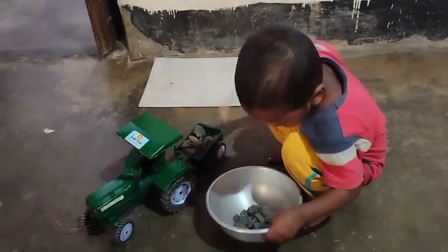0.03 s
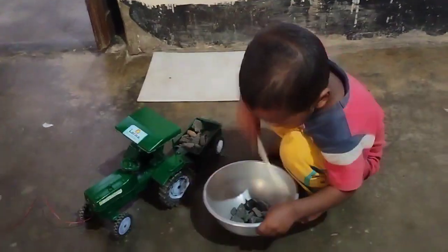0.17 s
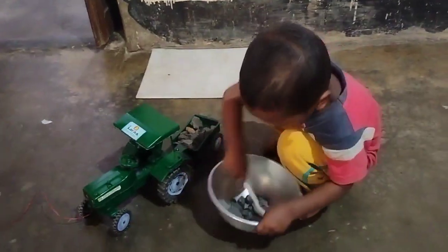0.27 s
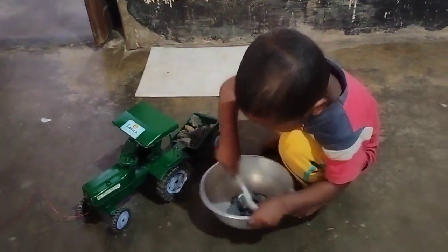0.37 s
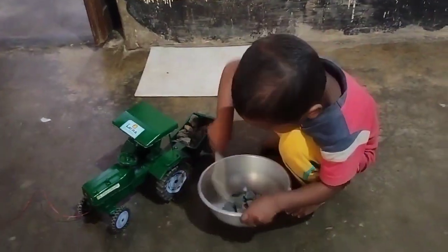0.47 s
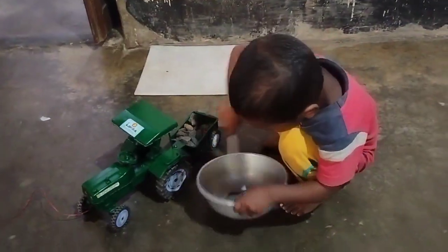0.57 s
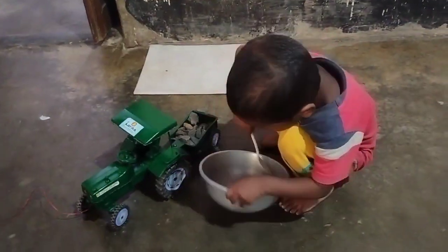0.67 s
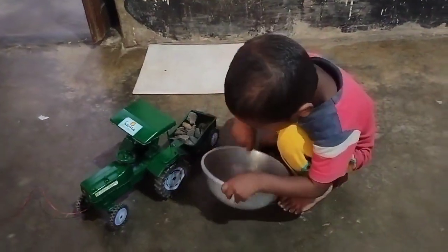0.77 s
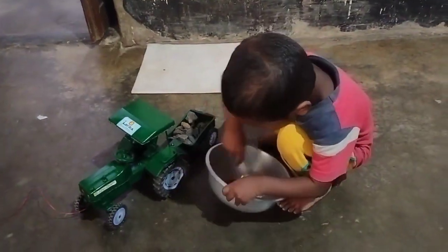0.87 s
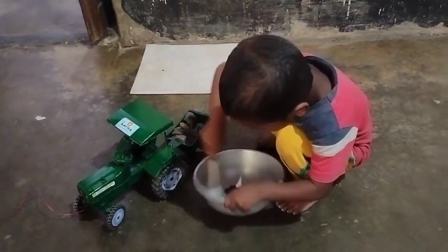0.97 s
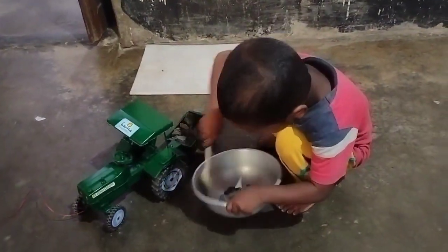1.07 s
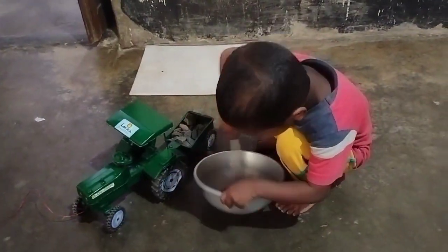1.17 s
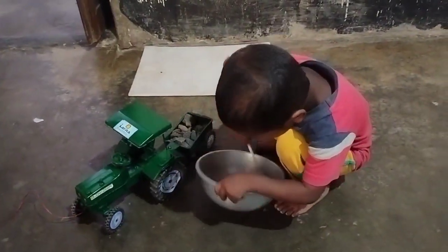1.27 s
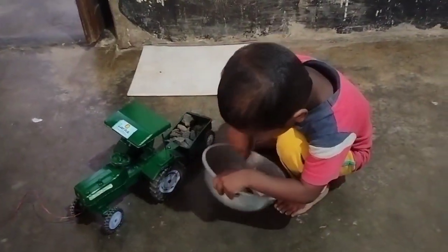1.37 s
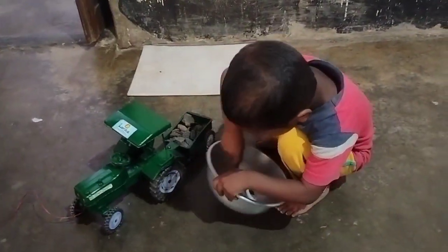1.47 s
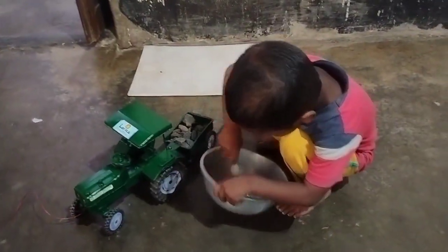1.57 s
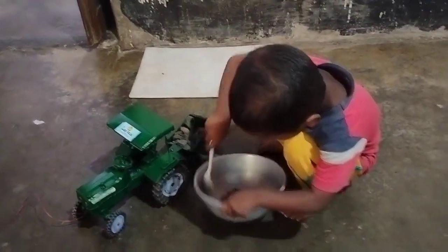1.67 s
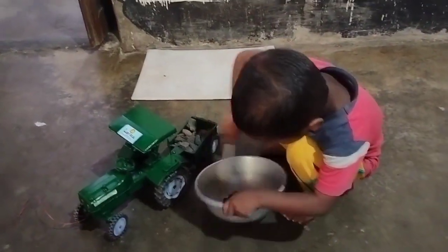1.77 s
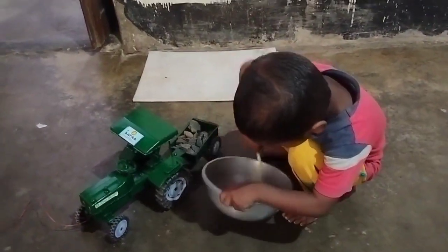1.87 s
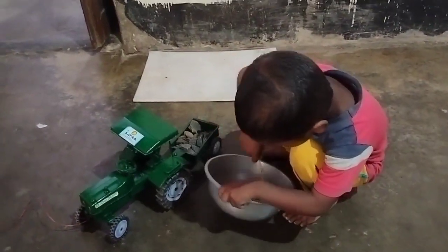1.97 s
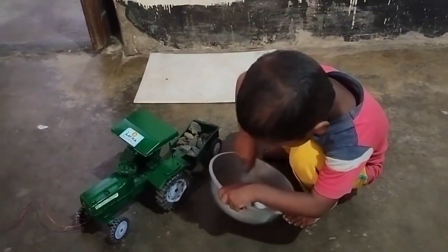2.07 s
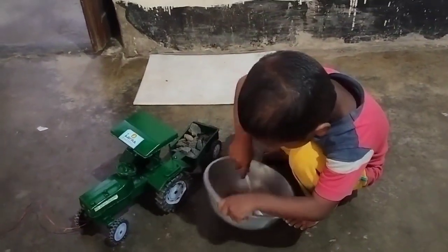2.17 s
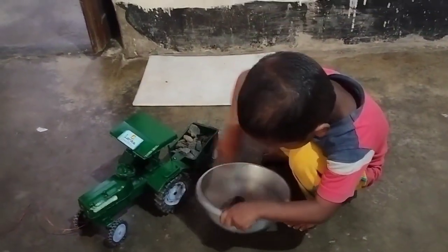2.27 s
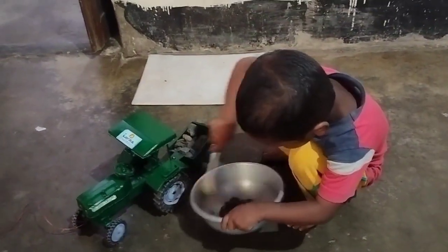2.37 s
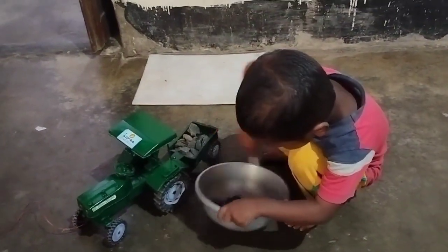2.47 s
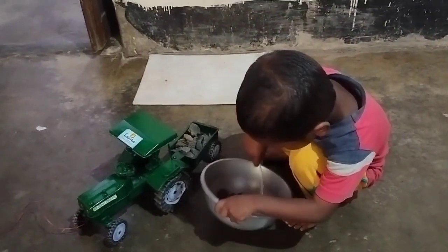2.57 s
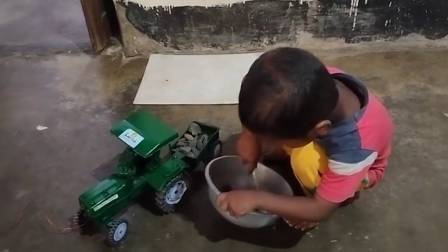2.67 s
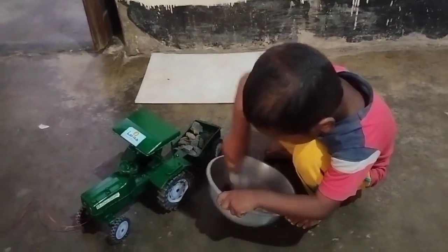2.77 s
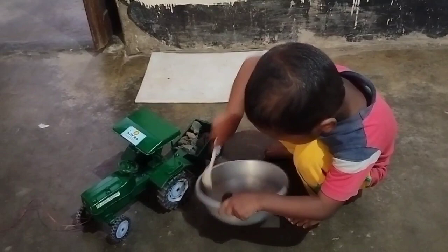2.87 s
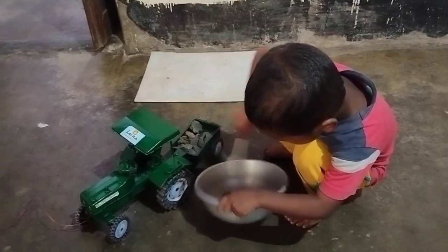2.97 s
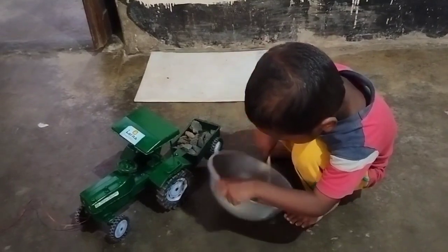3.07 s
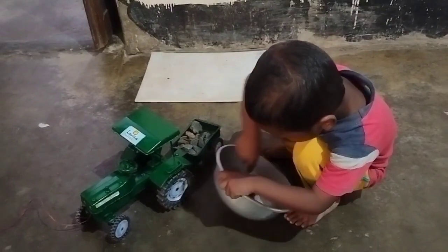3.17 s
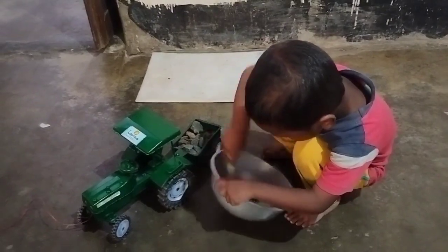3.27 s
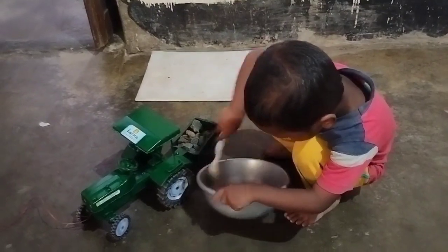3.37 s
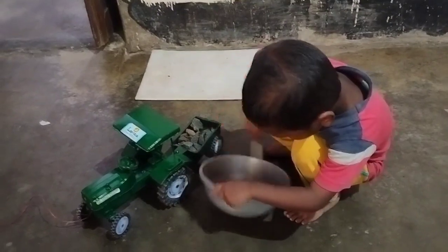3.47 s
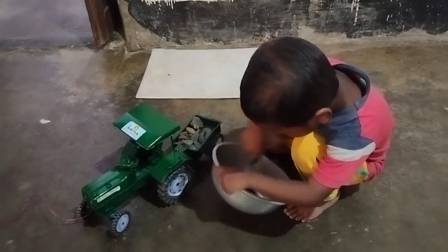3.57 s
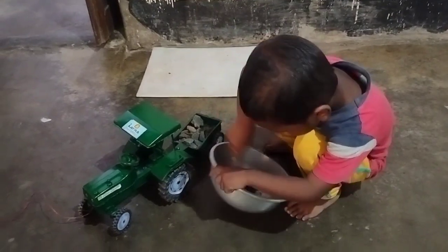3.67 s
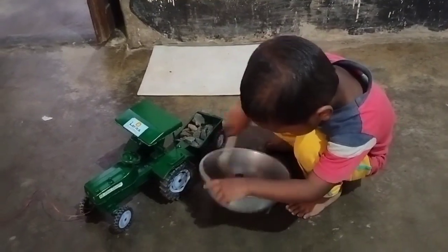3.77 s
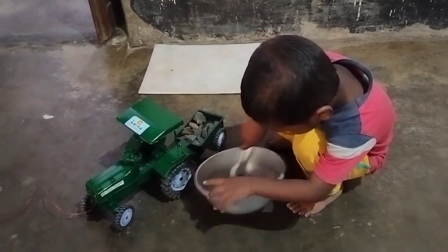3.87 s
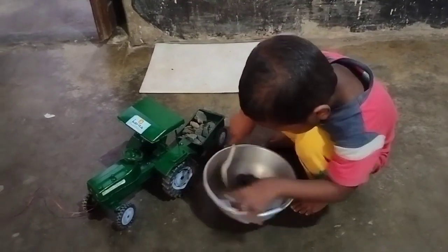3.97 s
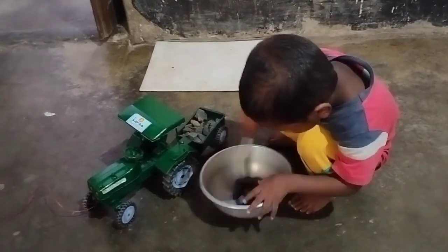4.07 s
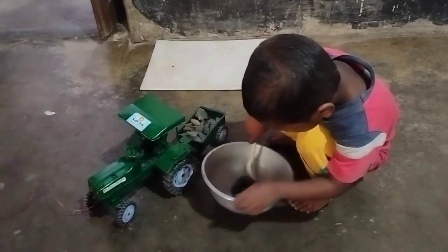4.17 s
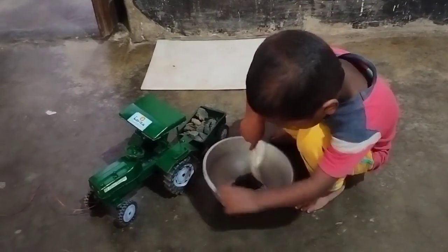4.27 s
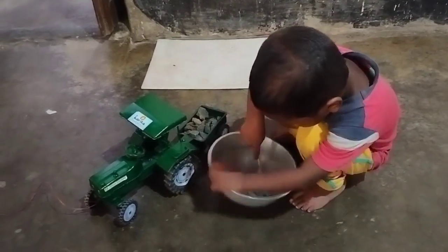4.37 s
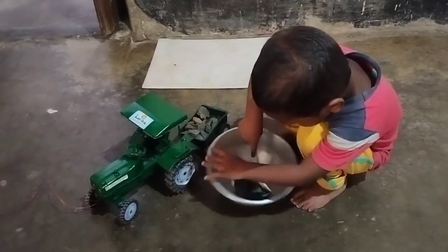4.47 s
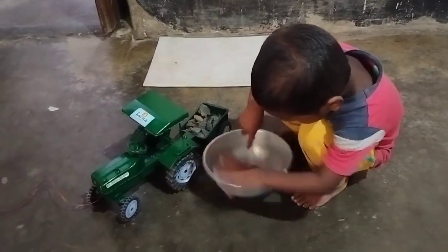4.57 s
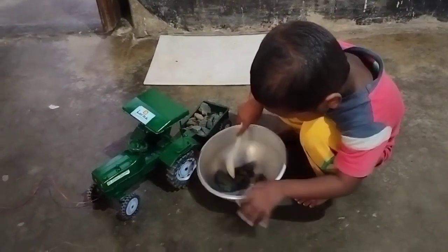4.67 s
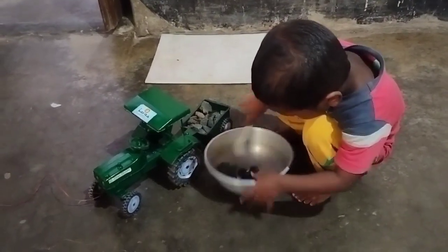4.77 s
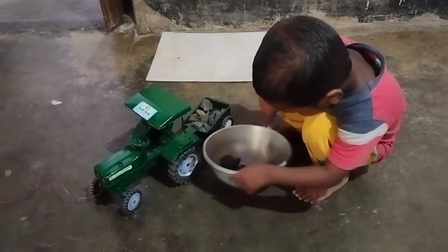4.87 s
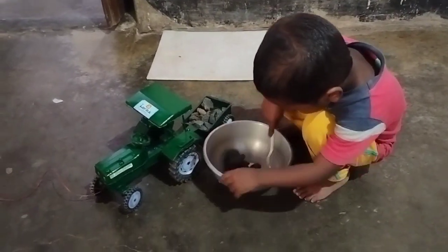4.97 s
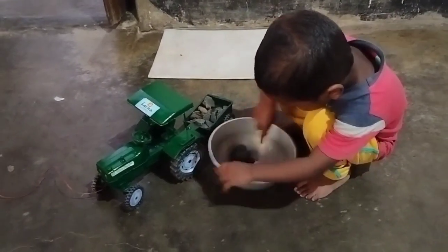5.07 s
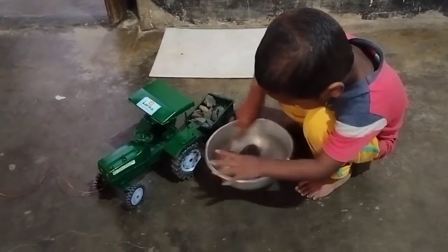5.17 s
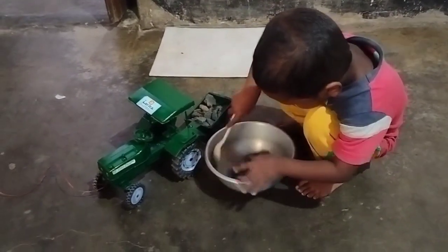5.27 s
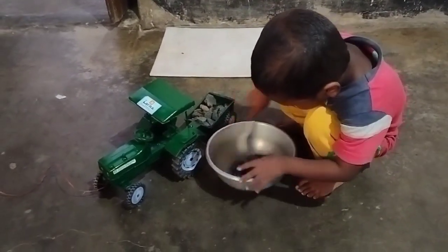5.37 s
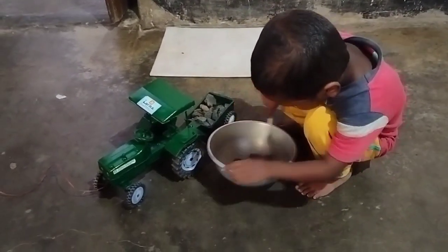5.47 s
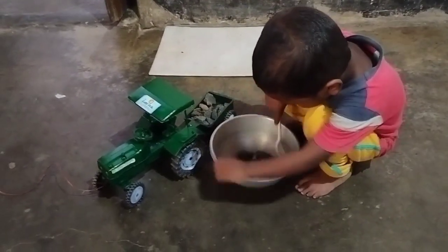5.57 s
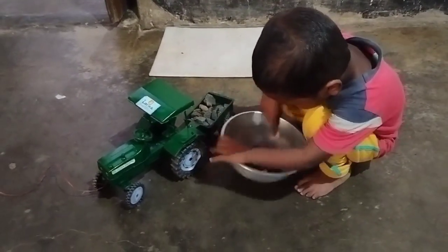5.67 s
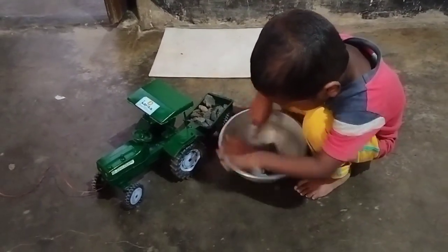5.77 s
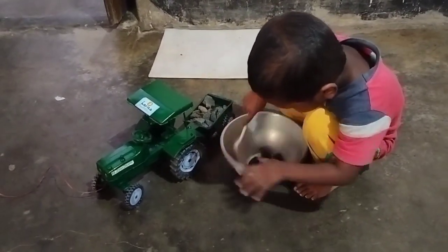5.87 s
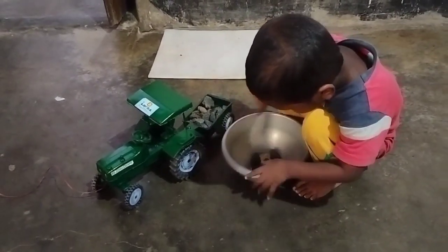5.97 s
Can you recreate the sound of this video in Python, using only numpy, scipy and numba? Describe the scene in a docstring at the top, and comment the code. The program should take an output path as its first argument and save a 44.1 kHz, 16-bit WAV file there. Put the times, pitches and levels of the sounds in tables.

```python
"""On a concrete floor in a bare, hard room, small stones are scooped with a spoon in a hand-held steel bowl.
Shoves, spills and scrapes are random impacts under slow envelopes, coloured by the kind of contact.
Knocks are bursts of rebounds with a short clank, pebbles sine ticks, bumps low swings, rubs gliding resonances.
Contacts ring damped modes of the bowl; close echoes and a room tail follow, over quiet air.
A phone hears it all with two unlike microphones."""
import sys
import numpy as np
from scipy import signal
from scipy.fft import rfft, irfft
from scipy.io import wavfile
from scipy.ndimage import uniform_filter1d
from numba import njit

SR = 44100
rng = np.random.default_rng(int(sys.argv[2]) if len(sys.argv) > 2 else 0)


def waveform_to_disk(signal):
    """Save audio, clipped to [-1, 1], as 16-bit WAV at the path in sys.argv[1]."""
    frames = np.transpose(np.atleast_2d(signal))
    scaled = np.clip(frames, -1, 1) * 32767
    samples = np.round(scaled).astype(np.int16)
    wavfile.write(sys.argv[1], SR, samples)


N = 266089
TIME = np.arange(N) / SR
TOP_HZ = 15300

# source levels in the tables are relative, ahead of the trims in the code
# spoon and stones knocking on the bowl, rms over 5 ms:
# [t/s, wall thud level/dB, stone clack level/dB, edge crack level/dB, steel clank level/dB, clank f/Hz]
KNOCK_EVENTS = [(0.051, -61, -31.5, -52, -40, 2510), (0.302, -8, -17, -21, -7, 810),
                (0.314, -15.5, -8, -10.5, -21, 3550), (0.327, -13, -15, -18, -17, 1470),
                (0.432, -17, -17, -11, -35, 2840), (0.476, -30, -11, -33, -25, 3330),
                (0.487, -16, -9, -33, -22, 3760), (0.529, -18, -10, -26, -30, 2800),
                (0.541, -22, -11, -17, -38, 2750), (0.558, -17, -35, -8.5, -9, 1470),
                (0.842, -27, -21, -35, -28, 2210), (0.895, -30, -20, -40, -40, 855),
                (0.944, -22, -18.5, -27, -30, 845), (1.0, -20, -31, -18, -14, 1500),
                (1.008, -17.5, -30, -12.5, -16.5, 1460), (1.196, -31, -32, -25.5, -28, 1410),
                (1.275, -23.5, -35, -26.5, -20, 1470), (1.505, -21, -22, -35, -30, 3400),
                (1.535, -13.5, -13.5, -21.5, -15, 910), (1.604, -20, -21, -24.5, -19, 920),
                (1.651, -24, -34, -20, -20.5, 640), (1.746, -27, -15.5, -21, -13.5, 1410),
                (1.767, -45, -28, -39, -21, 2780), (1.982, -42, -32, -34, -45, 2980),
                (2.028, -25.5, -25, -40, -36, 3400), (2.154, -27, -24, -40, -33, 3700),
                (2.164, -11.5, -11.5, -24, -10, 920), (2.18, -20.5, -33, -42, -19, 780),
                (2.281, -15, -10, -32, -16, 795), (2.303, -28, -4.5, -22, -11.5, 2150),
                (2.365, -16.5, -17, -7.5, -11, 2070), (2.375, -22, -12, -28, -9.5, 1030),
                (2.467, -38, -25, -14.5, -20.5, 2860), (2.509, -45, -36, -18, -10.5, 1430),
                (2.581, -34, -30, -13.5, -23, 2900), (2.687, -34, -20.5, -25.5, -26, 3430),
                (2.776, -18.5, -15, -22.5, -38, 750), (2.828, -38, -10, -20, -19, 3330),
                (2.835, -44, -22, -15, -13.5, 2070), (2.864, -41, -22, -36, -25, 2070),
                (2.92, -20, -33, -14, -36, 1030), (2.981, -29, -16, -22, -37, 2860),
                (3.101, -17.5, -33, -27, -16.5, 1045), (3.232, -14, -19, -21, -21, 785),
                (3.256, -28, -16.5, -27, -23, 2910), (3.542, -32, -23, -17, -16, 2790),
                (3.562, -19.5, -37, -27, -15, 2750), (3.645, -9, -11, -17, -14, 1530),
                (3.745, -32, -29, -35, -25, 2900), (3.875, -28, -11.5, -22, -14, 1490),
                (3.927, -15.5, -14, -16.5, -15, 3910), (4.008, -21, -11.5, -28, -17, 3080),
                (4.02, -26, -15, -17, -19, 2420), (4.105, -14.5, -12.5, -12.5, -11.5, 2000),
                (4.146, -11.5, -17, -9.5, -8, 1460), (4.182, -26, -14, -21, -9, 2040),
                (4.197, -30, -24, -29, -11, 2640), (4.402, -42, -41, -20.5, -38, 765),
                (4.57, -44, -36, -24, -40, 2850), (4.605, -31, -19, -24, -24, 2780),
                (4.715, -16, -17, -15, -4.5, 1480), (4.731, -30, -14, -15, -5, 2020),
                (4.811, -25, -34, -18, -9.5, 1480), (4.83, -42, -5.5, -19, -27, 2850),
                (4.937, -38, -7.5, -18, -13, 3000), (4.989, -41, -16, -24, -23, 2840),
                (5.005, -35, -23, -16.5, -31, 2840), (5.08, -42, -22, -40, -26, 2900),
                (5.162, -51, -18.5, -26, -37, 2780), (5.223, -14.5, -13, -21, -13, 2200),
                (5.274, -23, -13, -19, -15, 2600), (5.299, -34, -22, -24, -25, 2130),
                (5.363, -33, -21, -25, -30, 2800), (5.467, -21, -17.5, -35, -18.5, 1430),
                (5.852, -40, -29, -48, -28, 2620), (5.899, -29, -14.5, -27, -13.5, 2540),
                (5.955, -20, -16.5, -14.5, -14.5, 2790), (5.97, -18, -25, -20, -12, 2780)]
# dull bumps against the floor: [t/s, level/dB, f/Hz, decay/s]
BUMP_EVENTS = [(0.03, -39, 138, 0.056), (0.314, -11.5, 54, 0.0028), (0.558, -0.5, 44, 0.0057),
               (2.3, -23, 60, 0.011), (2.372, -18, 55, 0.0052), (3.882, -27, 45, 0.0066),
               (4.005, -22.5, 150, 0.022), (4.157, -22, 50, 0.0049), (4.698, -24, 149, 0.013),
               (5.189, -33, 150, 0.08), (5.353, -31.5, 152, 0.034), (5.953, -26, 210, 0.0085)]
# shoves, the bowl's foot juddering over the floor: [t/s, length/s, level/dB, hollow of tilted wall f/Hz]
SHOVE_EVENTS = [(0.035, 0.03, -38, 1120), (0.305, 0.17, -29.5, 800), (0.496, 0.12, -24, 1010),
                (0.81, 0.069, -30, 810), (0.94, 0.039, -23.5, 990), (1.535, 0.11, -27.5, 610),
                (2.163, 0.047, -28, 800), (2.297, 0.064, -22.5, 760), (2.455, 0.1, -26.5, 1030),
                (2.775, 0.017, -32, 790), (2.9, 0.06, -29.5, 1250), (3.23, 0.042, -25.5, 830),
                (3.384, .12, -31, 760), (3.54, 0.033, -25.5, 960), (3.645, 0.043, -26, 835),
                (3.81, 0.17, -23, 1280), (3.99, 0.22, -23, 810), (4.61, 0.1, -25, 755),
                (4.675, 0.11, -22, 1010), (4.879, 0.08, -29, 910), (5.19, 0.13, -28, 1040),
                (5.865, 0.063, -30, 694), (5.94, 0.067, -25, 730)]
# spills, pushed stones tumbling and settling: [t/s, length/s, level/dB, clack f/Hz]
SPILL_EVENTS = [(0.053, 0.02, -43, 2500), (0.31, 0.18, -28, 2740), (0.472, 0.041, -20.5, 3800),
                (0.54, 0.13, -23.5, 2030), (0.7, 0.26, -45, 2100), (0.94, 0.069, -26, 1700),
                (1.535, 0.2, -34.5, 2720), (1.84, 0.05, -29.5, 1600), (2.302, 0.2, -25, 2150),
                (2.827, 0.035, -22.5, 2580), (2.98, 0.11, -26, 3000), (3.25, 0.094, -26.5, 1930),
                (3.515, 0.029, -24.5, 2960), (3.64, 0.15, -30.5, 1830), (3.87, 0.13, -24, 3370),
                (4.005, 0.17, -22, 3050), (4.23, 0.25, -33, 2400), (4.555, 0.051, -32, 2850),
                (4.6, 0.11, -24.5, 2730), (4.7, 0.2, -22, 2370), (4.937, 0.1, -26, 2000),
                (5.222, 0.1, -20.5, 1960), (5.35, 0.08, -29, 2970), (5.865, 0.047, -25, 2600),
                (5.912, 0.069, -23, 2640)]
# scrapes, grit crushed under steel: [t/s, length/s, level/dB]
SCRAPE_EVENTS = [(0.3, 0.061, -30), (0.47, 0.22, -25.5), (0.98, 0.096, -28), (1.16, 0.064, -33),
                 (1.385, 0.024, -38.5), (1.645, 0.13, -28), (1.82, 0.054, -24.5), (2.11, 0.047, -40),
                 (2.302, 0.031, -16.5), (2.34, 0.21, -26.5), (2.86, 0.12, -26), (3.03, 0.052, -18.5),
                 (3.38, 0.062, -23), (3.45, 0.075, -21), (3.512, 0.024, -15), (3.68, 0.076, -31),
                 (3.79, 0.089, -22), (3.96, 0.26, -28.5), (4.595, 0.09, -27.5), (4.67, 0.096, -22),
                 (4.79, 0.066, -24.5), (4.96, 0.062, -28), (5.205, 0.16, -30.5), (5.39, 0.038, -25),
                 (5.685, 0.0093, -39), (5.945, 0.062, -28.5)]
# hands keeping bowl and stones faintly astir: [t/s, length/s, level/dB]
HANDLING_EVENTS = [(0.012, 0.026, -60), (0.31, 1.03, -44.5), (1.53, 0.36, -44.5), (2.3, 0.39, -45.5),
                   (2.78, 0.36, -41), (3.24, 1.233, -43), (4.58, 0.51, -39.5), (5.21, 0.28, -40.5),
                   (5.68, 0.36, -55.5)]
# rubs, the dragged wall singing hollowly: [t/s, length/s, level/dB, start f/Hz, end f/Hz]
RUB_EVENTS = [(1.185, 0.1, -28, 1410, 1290), (1.28, 0.07, -30.5, 1060, 950),
              (1.84, 0.03, -24.5, 1380, 1250), (1.859, 0.085, -25, 880, 950),
              (2.546, 0.058, -25.5, 920, 900), (3.088, 0.038, -22, 920, 814),
              (3.528, 0.18, -33, 1400, 1450), (5.451, 0.085, -24.5, 870, 815),
              (5.675, 0.024, -34, 850, 780)]
# modes of the hand-held bowl: [f/Hz, level/dB, t60/s]
BOWL_MODES = [(332.8, 4, 0.29), (527, -1.5, 0.16), (663, -4, 0.31), (740.7, 0, 0.17), (852, -10.5, 0.4),
              (995, -5, 0.17), (1250, -22, 0.25), (1433, -8.5, 0.058), (1830, -3, 0.1), (1893, -3, 0.063),
              (2112, 0.5, 0.084), (2077, 0.5, 0.1), (2330, -12, 0.21), (2535, -5.5, 0.099),
              (2845, -2, 0.15), (2956, -13, 0.062), (3640, -5, 0.021)]
# contact spectra of wall, stone and grit: [f/Hz, level/dB]
WALL_SPECTRUM = [(40, -26), (130, -32), (240, -12.5), (310, -2), (430, -10), (560, -1), (800, -1),
                 (1000, -1.5), (1160, -13.5), (1430, -1.5), (1750, -14.5), (3000, -11), (7000, -51.5)]
STONE_SPECTRUM = [(45, -30), (95, -24), (150, -9.5), (230, -11.5), (310, -10), (700, -2.5), (1250, -15),
                  (1650, -4.5), (2050, 0), (2950, 0.5), (3400, -4), (4400, -11), (5800, -18.5),
                  (15000, -19)]
GRIT_SPECTRUM = [(300, -25), (2000, -2), (4000, -9.5), (5500, -11), (7000, -8.5), (9000, -2), (10200, -2.5),
                 (12000, 3), (13500, 2.5), (15000, -4)]
# colour of the microphones: [f/Hz, left level/dB, right level/dB]
PORT_SPECTRA = [(102, -15.5, -13.5), (483, -2.5, -3), (810, -1.5, 0.5), (1910, -3.5, 0.5),
                (3070, -7.5, 5.5), (3430, -3, 1.5), (4800, -1.5, 4), (6070, 2, 1.5), (8040, 5, -6),
                (8750, -0.5, 1), (10720, -2, 10), (11740, -10, 5.5), (14040, -12.5, -10.5)]
# quiet air of the room: [f/Hz, level/dB]
AIR_SPECTRUM = [(30, 5), (90, 12.5), (140, 13.5), (220, 10), (800, -17), (3000, -37), (15000, -47)]
# shape shared by movements of a kind: (attack/s, sag/(dB/s), release/s); negative sag swells
SHOVE_SHAPE, SPILL_SHAPE = (0.0048, 4, 0.034), (0.0062, 15.5, 0.037)
SCRAPE_SHAPE, RUB_SHAPE = (0.0098, -11, 0.011), (0.015, -3, 0.021)
HANDLING_SHAPE = (0.0029, 1.0, 0.076)


def undb(db):
    """Decibels to gain."""
    return 10 ** (np.asarray(db) / 20)


def unit(x):
    """Scale to rms 1."""
    return x / np.sqrt(np.mean(x ** 2))


def convolve(x, response):
    """Pass a sound through a response."""
    return signal.oaconvolve(x, response)[:N]


def butter(x, order, hz, kind):
    """Butterworth filter."""
    return signal.sosfilt(signal.butter(order, hz, kind, fs=SR, output="sos"), x)


def colour(points, size=2048):
    """Minimum-phase click with the given (Hz, dB) spectrum, by folding the cepstrum."""
    hz, db = np.transpose(points)
    bins_hz = np.maximum(np.arange(size // 2 + 1) * SR / size, 1)
    gain = undb(np.interp(np.log(bins_hz), np.log(hz), db))
    cepstrum = irfft(np.log(gain))
    cepstrum[1:size // 2] *= 2
    cepstrum[size // 2 + 1:] = 0
    return irfft(np.exp(rfft(cepstrum)))


def contact(force, spectrum):
    """Colour a force by the kind of contact, through a click of energy 1."""
    click = colour(spectrum)
    return convolve(force, click / np.linalg.norm(click))


@njit
def band_pass(x, hz, width_hz):
    """State-variable resonance with a moving centre, gain 1 at the centre."""
    y, band, low = np.empty(len(x)), 0., 0.
    for i in range(len(x)):
        g, k = np.tan(np.pi * hz[i] / SR), width_hz / hz[i]
        v = (band + g * (x[i] - low)) / (1 + g * (g + k))
        band, low, y[i] = 2 * v - band, low + 2 * g * v, k * v
    return y


def wander(rate_hz):
    """Smooth random path that turns about rate_hz times a second; rms 1."""
    hold = int(SR / rate_hz)
    steps = np.repeat(rng.standard_normal(N // hold + 1), hold)[:N]
    return unit(uniform_filter1d(steps, hold))


def grains(rate_hz, spread_db, size=N):
    """Random tiny impacts, many weak and a few strong; rms 1."""
    strength = undb(spread_db * np.minimum(rng.exponential(size=size), 4))
    hits = rng.random(size) < rate_hz / SR
    return unit(hits * strength * rng.choice([-1, 1], size))


def catches(rate_hz, depth_db):
    """Uneven grip: a gain that jumps about as a rubbed surface catches and slips; rms 1."""
    hold = int(SR / rate_hz)
    steps = np.repeat(rng.uniform(-1, 1, N // hold + 1), hold)[:N]
    return unit(uniform_filter1d(undb(depth_db * steps), hold // 2))


def movements(rows, attack_s, sag_db_per_s, release_s):
    """Strength over time: each movement gets going, sags (or swells) and comes to rest; powers add."""
    power = np.zeros(N)
    for start_s, length_s, db, *_ in rows:
        start = int(start_s * SR)
        age_s = TIME[:min(N - start, int((length_s + 8 * release_s) * SR))]
        rise = np.minimum(age_s / attack_s, 1)
        rest = np.exp(-np.maximum(age_s - length_s, 0) / release_s)
        power[start:start + len(age_s)] += (undb(db - sag_db_per_s * age_s) * rise * rest) ** 2
    return np.sqrt(power)


def pitch_of(rows):
    """Resonance in Hz: holds through each movement, shifts for the next as bowl tilts or other stones roll."""
    start_s, _, _, hz = np.transpose(rows)
    latest = np.maximum(np.searchsorted(start_s, TIME) - 1, 0)
    return uniform_filter1d(hz[latest], size=1024)


def port_noise(apart_hz, size):
    """Sound from all sides: alike at both ports in the bass, unrelated above."""
    mid, side = rng.standard_normal((2, size))
    side = butter(side, 2, apart_hz, "high")
    return np.array([mid + side, mid - side])


def spread(x, responses):
    """Send a sound to both ports through two responses of energy 1."""
    return np.array([convolve(x, r / np.linalg.norm(r)) for r in responses])


def room_air():
    """Quiet air: coloured noise, independent at each port."""
    return np.array([contact(rng.standard_normal(N), AIR_SPECTRUM) for _ in range(2)])


def judder(astir):
    """The foot judders over the floor: impacts on the wall, plus the hollow of the tilted bowl."""
    strength = np.hypot(movements(SHOVE_EVENTS, *SHOVE_SHAPE), undb(10.5) * astir)
    force = strength * grains(rate_hz=1800, spread_db=1.5)
    hollow = band_pass(force, pitch_of(SHOVE_EVENTS), 740.0)
    return contact(force + undb(4.5) * hollow, WALL_SPECTRUM)


def tumble(astir):
    """Stones tumble: uneven impacts, plus a clack resonance that wanders in pitch."""
    strength = np.hypot(movements(SPILL_EVENTS, *SPILL_SHAPE), astir)
    force = strength * unit(catches(rate_hz=300, depth_db=4.5) * grains(rate_hz=1500, spread_db=1.0))
    # the clack resonance drifts around the pitch of each spill
    clack_hz = pitch_of(SPILL_EVENTS) * (1 + 0.072 * wander(rate_hz=39))
    clack = band_pass(force, clack_hz, 370.0)
    return contact(force + undb(1.0) * clack, STONE_SPECTRUM)


def grind(astir):
    """Grit is crushed under steel: it breaks in tiny bursts of sharp cracks."""
    strength = np.hypot(movements(SCRAPE_EVENTS, *SCRAPE_SHAPE), undb(7.0) * astir)
    bursts = catches(rate_hz=330, depth_db=7.0)
    return contact(strength * bursts * grains(rate_hz=4200, spread_db=3.0), GRIT_SPECTRUM)


def scooping(judder_db, tumble_db, grind_db):
    """Foot, stones and grit in motion, all kept faintly astir by the hands."""
    astir = movements(HANDLING_EVENTS, *HANDLING_SHAPE)
    return undb(judder_db) * judder(astir) + undb(tumble_db) * tumble(astir) + undb(grind_db) * grind(astir)


def bumps(soft_hz):
    """Soft, heavy contacts with the floor: a sudden push and a low swing that dies away."""
    out, age_s = np.zeros(2 * N), TIME[:SR // 4]
    for start_s, db, hz, decay_s in BUMP_EVENTS:
        start = int(start_s * SR)
        swing = np.cos(2 * np.pi * hz * age_s) * np.exp(-age_s / decay_s)
        out[start:start + len(age_s)] -= undb(db) * swing
    return butter(out[:N], 2, [25, soft_hz], "band")


def chatter(decay_s, first, rise_s, size=2048):
    """Force of one knock: a sharp first touch, then rebounds that build quickly and die."""
    age_s = TIME[:size]
    rebounds = grains(rate_hz=4500, spread_db=2.5, size=size)
    force = rebounds * np.minimum(age_s / rise_s, 1) * np.exp(-age_s / decay_s)
    force /= np.linalg.norm(force)
    force[0] += first
    return force


def knocks(wall_db, stone_db, edge_db, clank_db, clank_s):
    """Knocks thud on the wall, clack the stone, crack grit and clank at the pitch of the spot they hit."""
    out, age_s = np.zeros(2 * N), TIME[:2048]
    clicks = [colour(spectrum) for spectrum in (WALL_SPECTRUM, STONE_SPECTRUM, GRIT_SPECTRUM)]
    trims_db = [wall_db, stone_db, edge_db, clank_db]
    for start_s, *levels_db, hz in KNOCK_EVENTS:
        start = int(start_s * SR)
        # the springy wall chatters on, the hard stone is done sooner
        long = chatter(decay_s=0.01, first=0.39, rise_s=0.0012)
        short = chatter(decay_s=0.0044, first=0.32, rise_s=0.00029)
        clank = np.sin(2 * np.pi * hz * age_s) * np.exp(-age_s / clank_s)
        pairs = zip((long, short, short, short), clicks + [clank])
        sounds = [convolve(force, response) for force, response in pairs]
        for sound, db in zip(sounds, np.add(levels_db, trims_db)):
            level = undb(db) * np.sqrt(.005 * SR) / np.linalg.norm(sound)  # rms over 5 ms
            out[start:start + len(sound)] += level * sound
    return out[:N]


def pebbles(rate_hz, low_hz, high_hz, ring_s, scatter_db, count=3000):
    """Pebbles tick on steel during spills: short sines, each with its own pitch and one rebound."""
    out, age_s = np.zeros(N + 1024), TIME[:256]
    draws = rng.random((count, 4))
    times_s = np.cumsum(-np.log(1 - draws[:, 0])) / rate_hz
    for tick_s, (_, pitch, strength, hop) in zip(times_s, draws):
        hz = low_hz * (high_hz / low_hz) ** pitch
        tick = undb(scatter_db * strength) * np.sin(2 * np.pi * hz * age_s) * np.exp(-age_s / ring_s)
        for hit_s, share in ((tick_s, 1), (tick_s + 0.008 * hop, .5)):
            start = int(hit_s * SR)
            if start < N:
                out[start:start + len(age_s)] += share * tick
    ticks = butter(out[:N], 2, 900, "high")
    return unit(ticks) * movements(SPILL_EVENTS, *SPILL_SHAPE)


def rubbing(spread_db, waver, width_hz):
    """Stick and slip drive a narrow hollow resonance, which glides as the bowl tilts."""
    out = np.zeros(N)
    slips = grains(rate_hz=2000, spread_db=spread_db)
    drift = 1 + waver * wander(rate_hz=45)
    for row in RUB_EVENTS:
        start_s, length_s, _, *ends_hz = row
        hz = np.interp(TIME, [start_s, start_s + length_s], ends_hz) * drift
        hollow = band_pass(band_pass(slips, hz, width_hz), hz, width_hz)
        out += unit(hollow) * movements([row], *RUB_SHAPE)
    return out


def bowl(x, ring_db, detune):
    """Damped steel modes; drive varies as the contact point moves, pitch with grip and load."""
    out = x.copy()
    for hz, db, t60_s in BOWL_MODES:
        drive = x * np.tanh(2 * wander(rate_hz=14))
        mode_hz = hz * (1 + detune * wander(rate_hz=8))
        width_hz = np.log(1000) / (np.pi * t60_s)
        out += undb(db + ring_db) * band_pass(drive, mode_hz, width_hz)
    return out


def reflections(x, decay_s, count=5, size=1024):
    """Quick echoes inside the bowl and off the floor; their pattern shifts as the bowl tilts."""
    fade = np.exp(-TIME[:size] / decay_s)
    shares = np.array([wander(rate_hz=16) for _ in range(count)])
    shares /= np.linalg.norm(shares, axis=0)
    return sum(spread(x * share, port_noise(apart_hz=850, size=size) * fade) for share in shares)


def room(x, t60_low_s, t60_high_s, treble_db):
    """Tail of the bare walls: decaying noise; the treble comes back weaker and dies sooner."""
    age_s = TIME[:3 * SR // 4]
    noise = port_noise(apart_hz=600, size=len(age_s)) * np.clip(age_s / 0.0053, 0, 1)  # builds up
    low, high = (butter(x, 3, 4500, kind) for kind in ("low", "high"))
    low_tail, high_tail = (noise * np.exp(-np.log(1000) * age_s / t60_s) for t60_s in (t60_low_s, t60_high_s))
    return spread(low, low_tail) + undb(treble_db) * spread(high, high_tail)


def scene():
    """Contacts sound through the bowl into the room; bumps and air are added directly."""
    contacts = (scooping(judder_db=-4.5, tumble_db=-1.75, grind_db=0.27)
                + knocks(wall_db=0.5, stone_db=-3.5, edge_db=-0.6, clank_db=-2.64, clank_s=0.0028)
                + undb(-5.2) * pebbles(rate_hz=280, low_hz=1600, high_hz=3690, ring_s=0.00034, scatter_db=13.5)
                + rubbing(spread_db=2.5, waver=0.055, width_hz=370.0))
    steel = bowl(contacts, ring_db=5.0, detune=0.0096)
    direct = np.array([steel, np.roll(steel, 2)])  # reaches the left port first
    near = undb(-6.5) * direct + undb(-4.5) * reflections(steel, decay_s=0.0032)
    walls = undb(-3.0) * room(steel, t60_low_s=0.78, t60_high_s=0.35, treble_db=-1.0)
    floor = undb([[1.5], [-4]]) * bumps(soft_hz=393)  # stronger at the left port
    return near + walls + floor + undb(-55.5) * room_air()


def record(dry):
    """Each microphone port has its own colour; the highest peaks are rounded and the top is cut."""
    ports = np.array(PORT_SPECTRA)
    coloured = np.array([convolve(x, colour(ports[:, [0, k + 1]])) for k, x in enumerate(dry)])
    rounded = coloured / (1 + (coloured / .9) ** 6) ** (1 / 6)
    return signal.sosfilt(signal.ellip(8, .2, 70, TOP_HZ, fs=SR, output="sos"), rounded)


dry = scene()
out = record(dry)
waveform_to_disk(out)
```